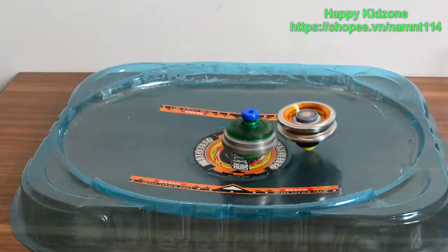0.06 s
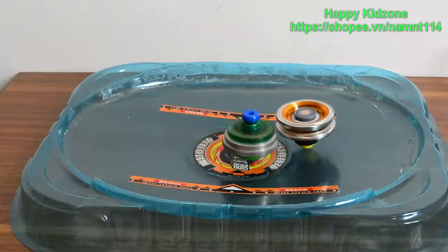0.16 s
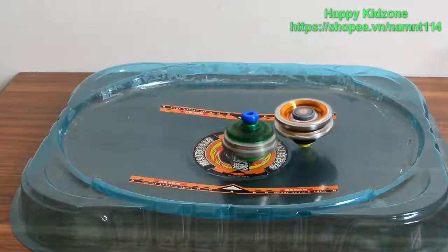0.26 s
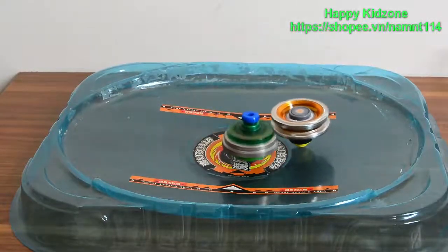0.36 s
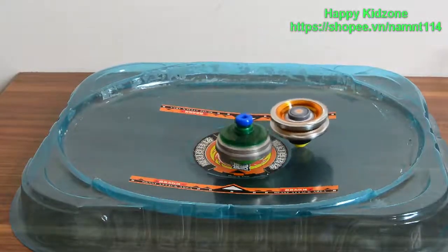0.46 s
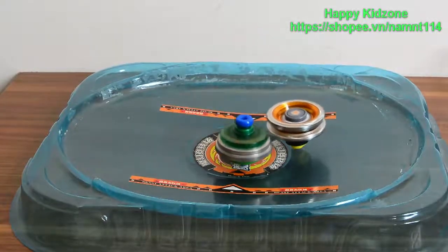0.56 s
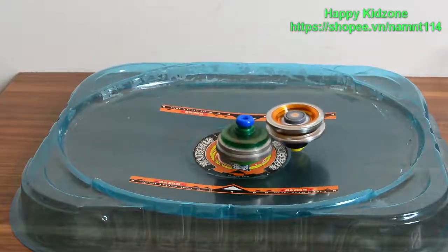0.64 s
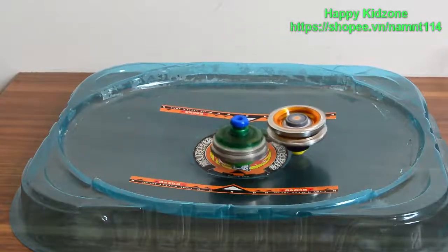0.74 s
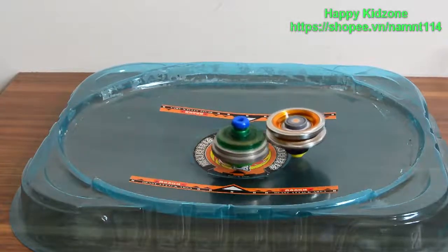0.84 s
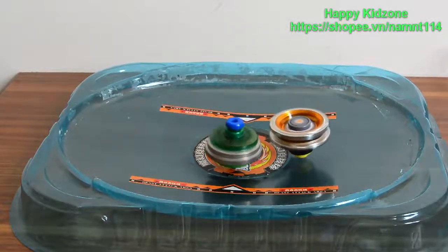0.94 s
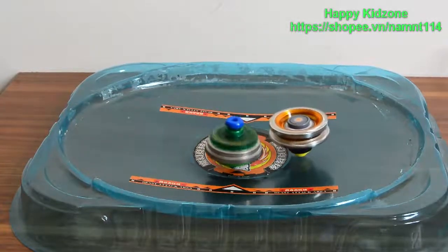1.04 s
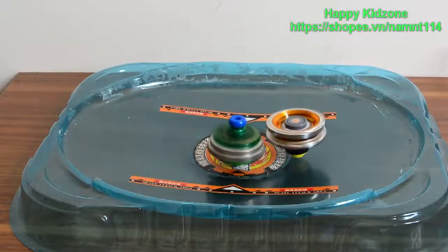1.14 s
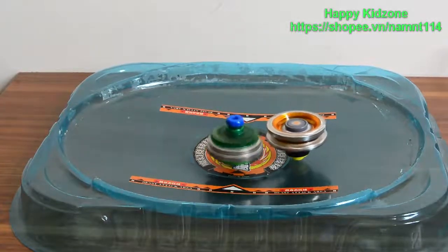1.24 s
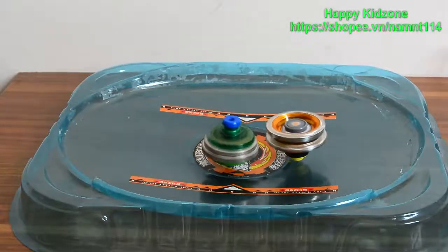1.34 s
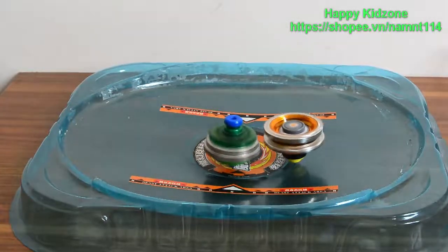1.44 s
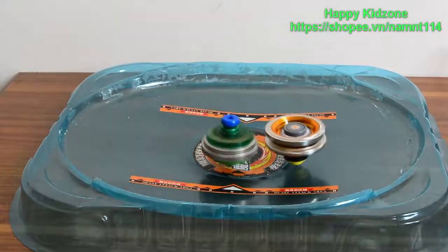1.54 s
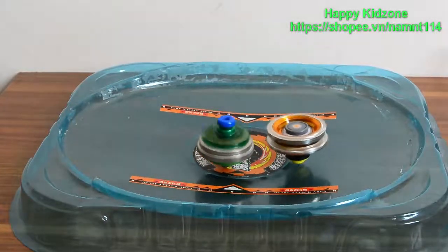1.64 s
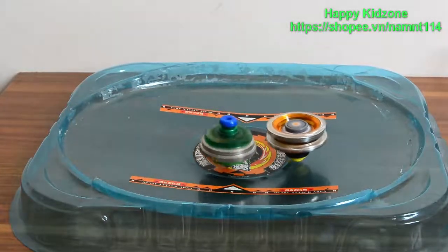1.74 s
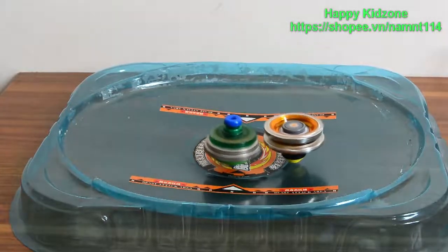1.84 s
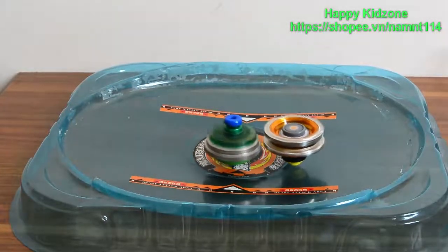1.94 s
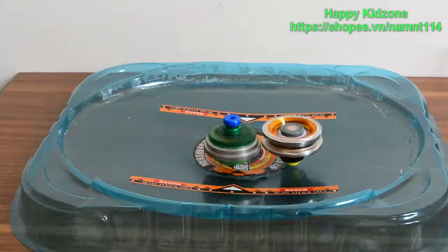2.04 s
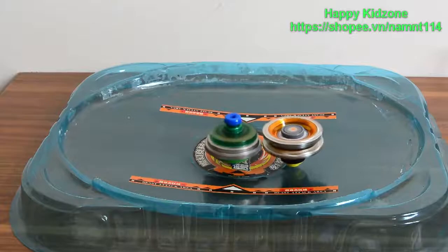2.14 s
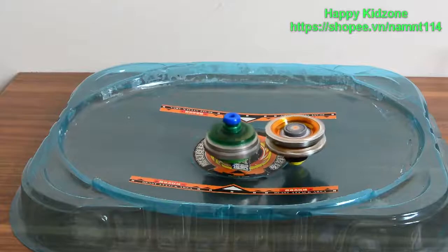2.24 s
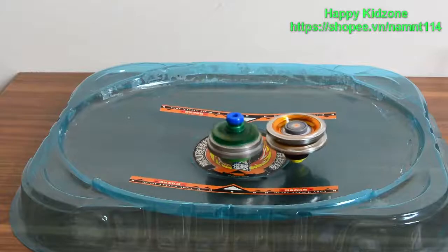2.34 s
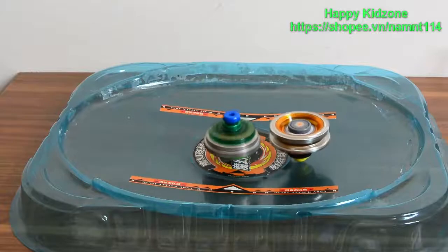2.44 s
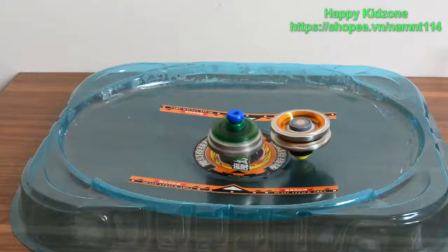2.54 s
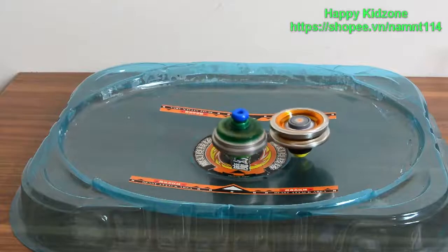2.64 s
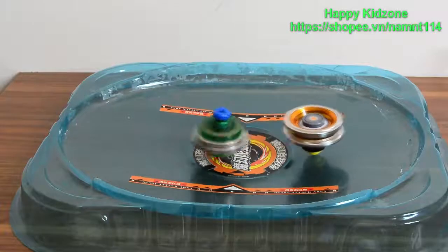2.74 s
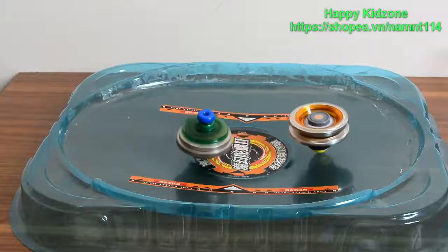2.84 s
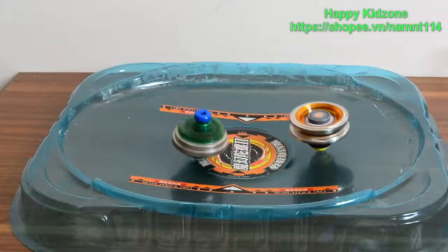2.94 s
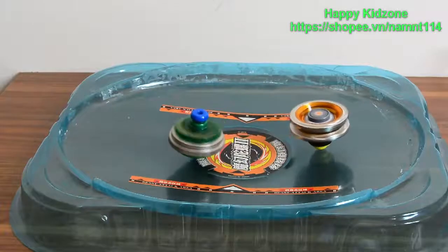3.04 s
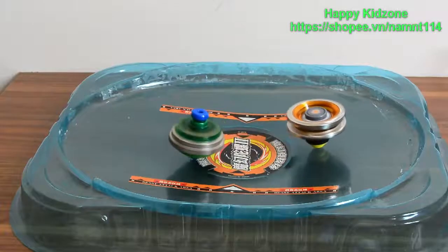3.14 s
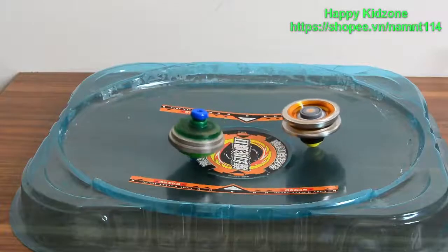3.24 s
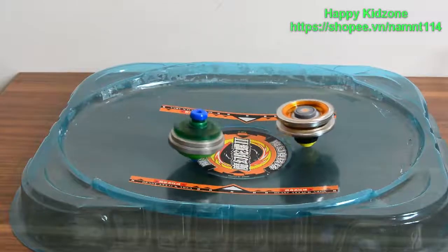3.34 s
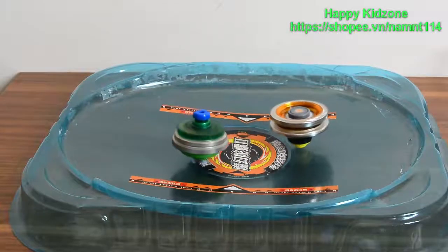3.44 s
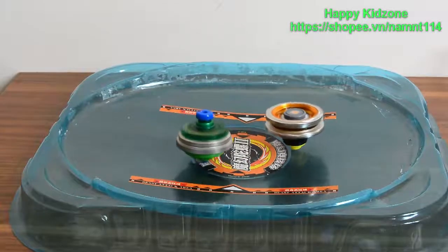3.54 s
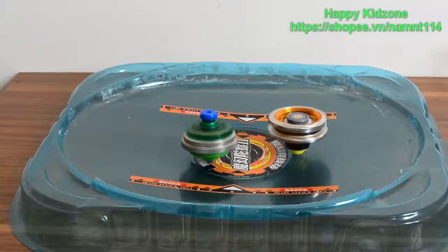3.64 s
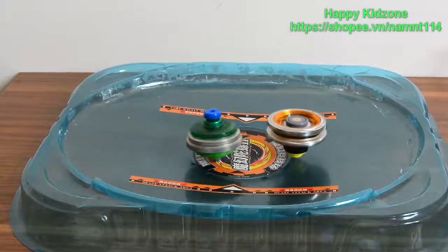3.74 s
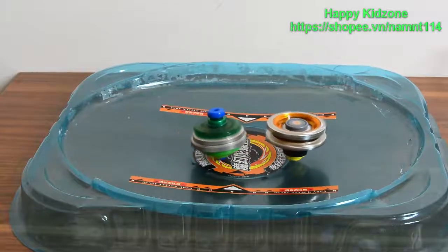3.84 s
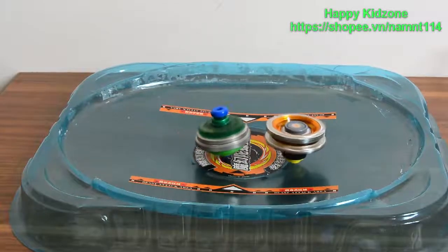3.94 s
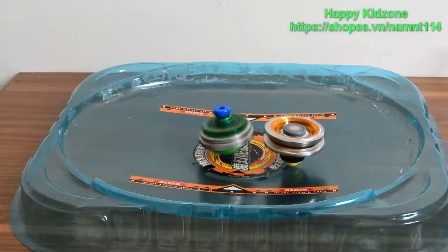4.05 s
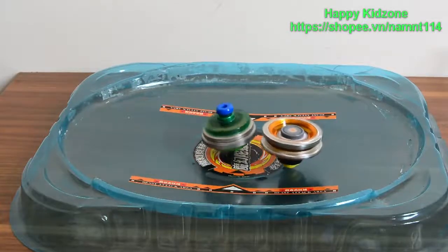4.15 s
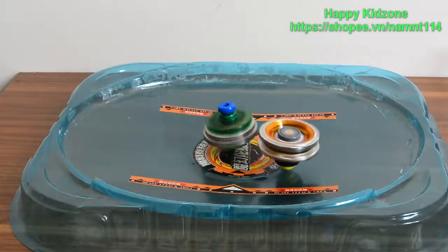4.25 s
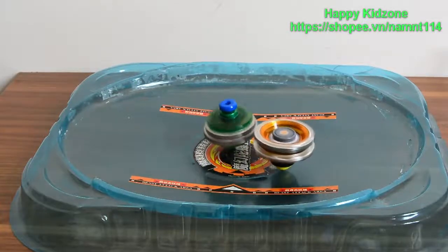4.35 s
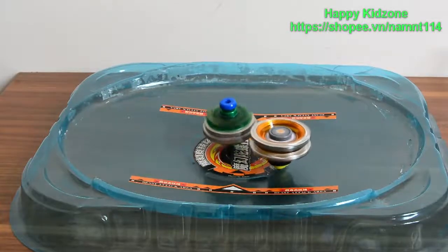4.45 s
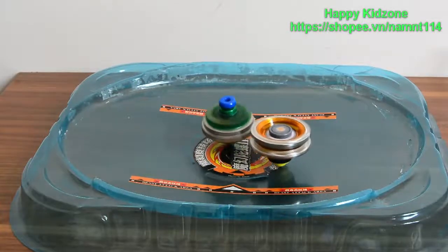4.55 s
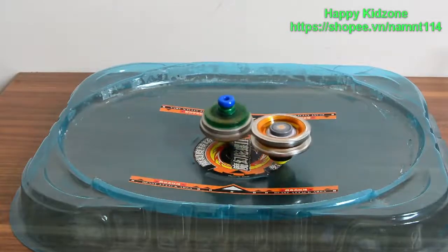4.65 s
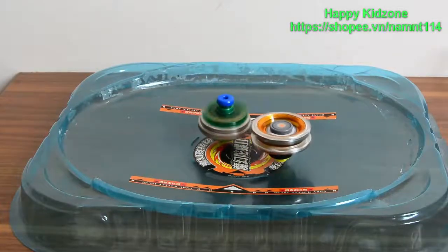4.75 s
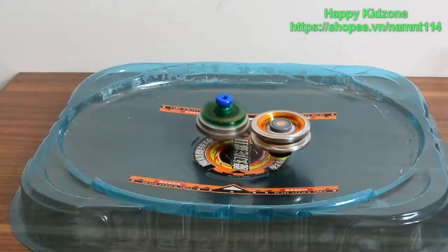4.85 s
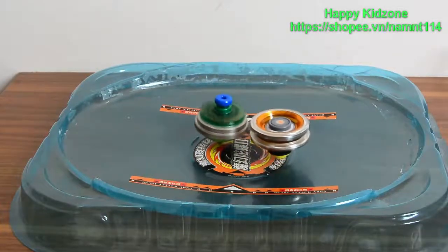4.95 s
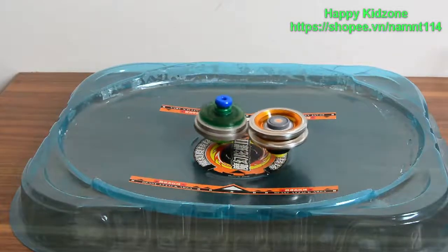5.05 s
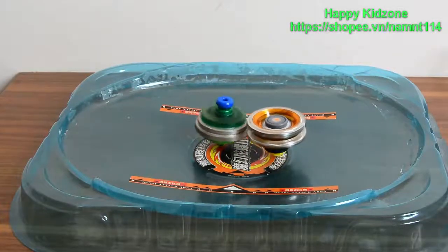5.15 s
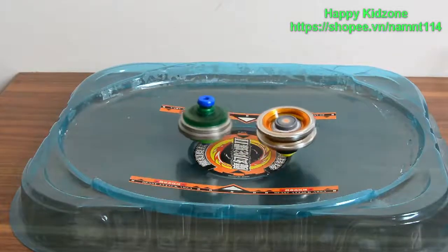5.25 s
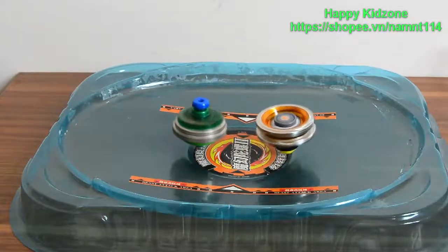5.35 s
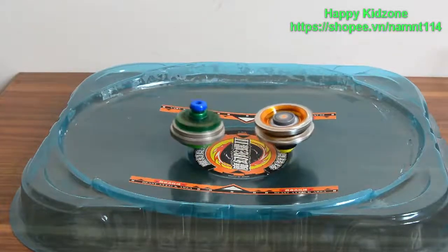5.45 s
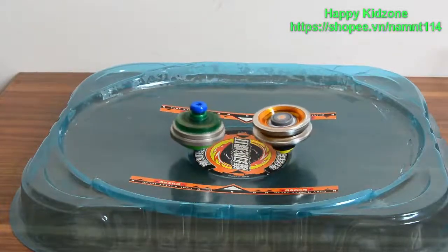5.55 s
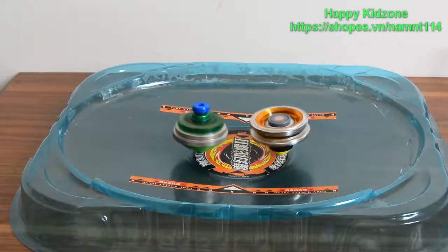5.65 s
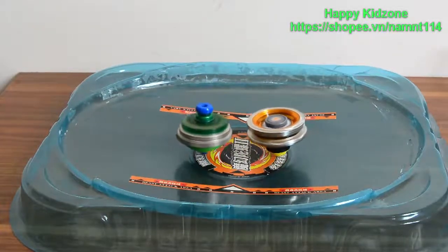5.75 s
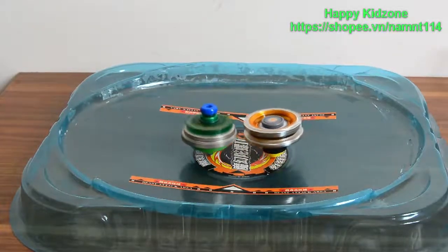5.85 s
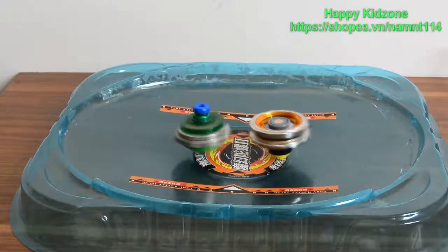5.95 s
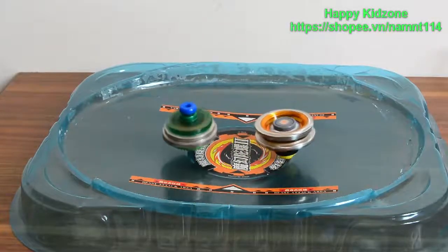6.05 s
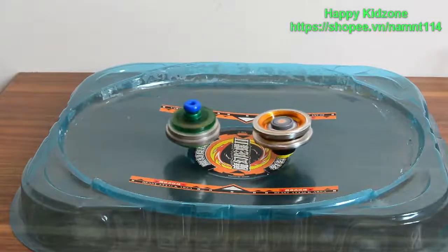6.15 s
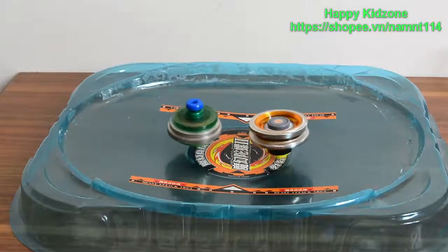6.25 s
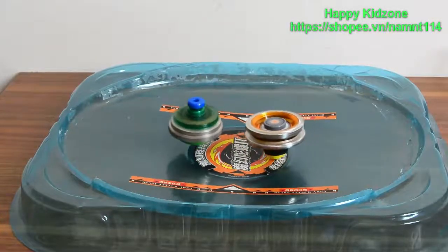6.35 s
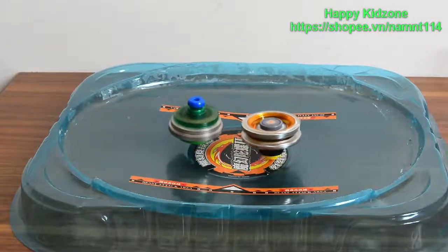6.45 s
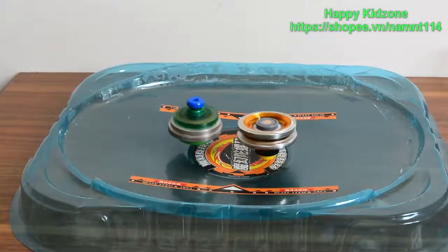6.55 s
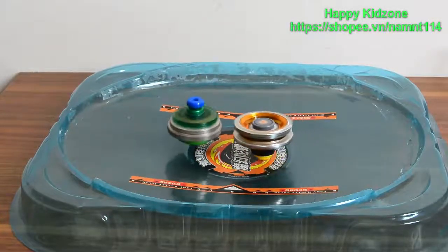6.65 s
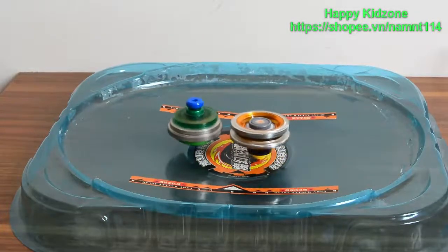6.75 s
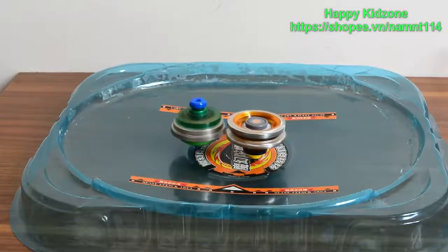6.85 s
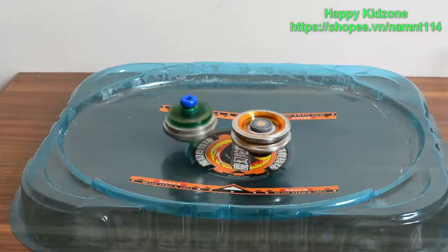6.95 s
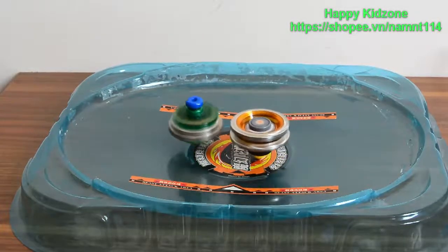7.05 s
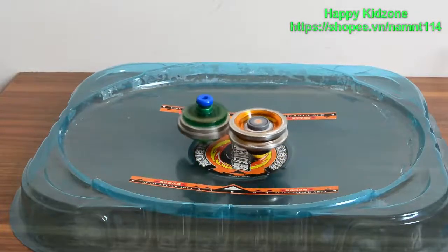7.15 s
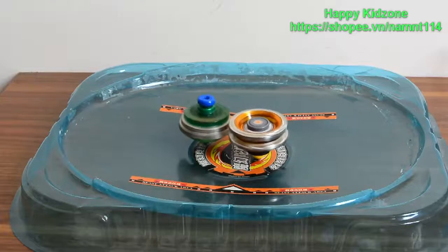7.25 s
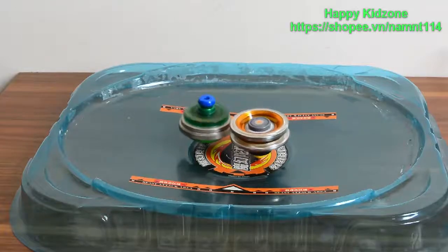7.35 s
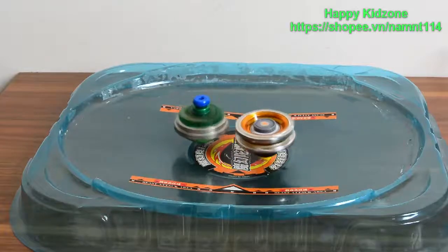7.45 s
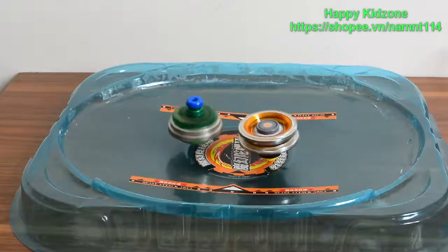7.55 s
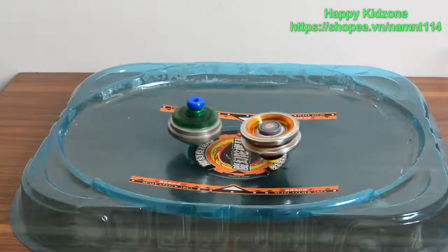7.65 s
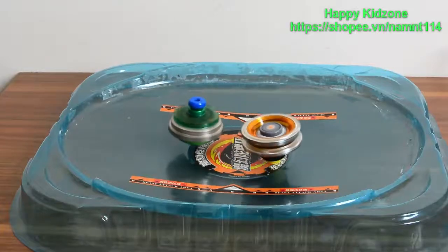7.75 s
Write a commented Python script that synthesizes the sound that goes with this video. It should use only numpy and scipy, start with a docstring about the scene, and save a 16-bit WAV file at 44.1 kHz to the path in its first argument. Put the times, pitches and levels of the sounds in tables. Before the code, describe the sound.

Frequent dry, bright clacks with brief steel ringing open the scene as two tops collide inside a hollow plastic arena. After the loudest blow, their tips skip and patter on the floor, fading over a couple of seconds. Quiet grinding continues, then widely spaced hard cracks return, with one soft thud and small plastic taps. Heard close up in a small bare room with short echoes.

```python
"""Two spinning tops with steel weight discs circle and clash in a thin plastic arena on a table, in a bare room.
Each clash is a crack of a few milliseconds that rings the tops' bodies and both discs; a wall and the room answer.
The tips rumble and scrape on the arena floor; flung apart by the hardest clash, the tops wobble and skip
until they settle, and single hard landings tap the floor. One soft bump and a steady dull room tone lie behind.
A limiter ducks peaks, then recovers."""
import sys
import numpy as np
from scipy import signal
from scipy.fft import rfft, irfft, next_fast_len
from scipy.io import wavfile
from scipy.ndimage import map_coordinates

SR = 44100
rng = np.random.default_rng(int(sys.argv[2]) if len(sys.argv) > 2 else 0)


def digitize_waveform(pressure):
    """Quantize a signal to 16-bit integers and store it at the path in sys.argv[1].

    Rows of a 2-D input are taken as channels; values are limited to [-1, 1].
    """
    field = np.atleast_2d(pressure).T
    bounded = np.clip(field, -1, 1)
    quanta = np.round(bounded * 32767).astype(np.int16)
    wavfile.write(sys.argv[1], SR, quanta)


N = 343980

# broad resonances of the arena floor: (frequency [Hz], width [Hz], level [dB])
FLOOR_MODES = [(516, 74, 1), (695, 83, 0), (805, 68, 2.5), (1190, 130, -9.5), (1713, 31, -21)]
# colour of the tips on the plastic: (frequency [Hz], relative level [dB])
TIP_COLOUR = [(300, -42.5), (700, 1.5), (1500, 4.5), (4000, 1.5), (8000, -4.5), (10500, -23.5),
              (12000, -49)]

# tips running smoothly on the floor: rms levels before their quick random flutter
RUMBLE_DB, SCRAPE_DB = -57, -55

# the spell of wobbling after the hardest clash: start, then time constants of rise and decay
WOBBLE_START_S, WOBBLE_RISE_S, WOBBLE_SETTLE_S = 3, 0.16, 0.66
SKIPS_PER_S, SKIP_DB = 120, -33  # small skips of the tips while they wobble
HOP_FLOOR_DB, HOP_RIM_DB = 19, 7  # how strongly floor and rim answer a tip
BOUNCE_S, BOUNCE_DB = .017, -4  # delay and loss of the one bounce after a hard landing

SNAP_T60_S = .003  # the first snap of rim on rim
RATTLE_S = 0.0036  # how long the rims rattle after it
SHELL_DB, SHELL_T60_S = -7, 0.059  # the plastic shell's short ring
THIN_BELOW_HZ, THIN_SHARE = 4100, 0.8  # the direct crack lacks this share of the lows
WALL_DELAY_S, WALL_DB = .011, -11  # the echo off the wall

RIM_TICK_LOW_HZ, RIM_TICK_HIGH_HZ = 4800, 5830  # squareness leaves this band unchanged
BODY_BELOW_HZ, SIZZLE_ABOVE_HZ, SIZZLE_SHARE = 3640, 8800, 0.67  # a square blow adds body and a share of sizzle
BOOM_BELOW_HZ, BOOM_GROWS, USUAL_FORCE_DB = 970, .4, -13.5  # harder blows boom more, in dB per dB
RIPPLE_DB, RIPPLE_STEP_HZ = 1.5, 130  # chance differences of colour from blow to blow

BLOW_DB, RING_DB = 7.5, -20.5  # mix gains of the coloured blow and of the discs' and bodies' low ring
TAIL_DB = -11.5  # the room's tail within the blow
BODY_DB, BODY_GROWS = -32.5, 0.6  # the bodies within the blow: louder the squarer it is, in dB per dB


def amp(db):
    """Decibels to gain."""
    return 10 ** (np.asarray(db) / 20)


def unit(x):
    """x at rms 1."""
    return x / np.sqrt(np.mean(x ** 2) + 1e-20)


def along(points, hz):
    """(Hz, value) points read on a log frequency axis."""
    f, v = np.transpose(points)
    return np.interp(np.log(hz + 1), np.log(f + 1), v)


def wobble(rate):
    """A smooth random curve through rate knots a second."""
    knots = rng.standard_normal(int(N * rate / SR) + 4)
    return map_coordinates(knots, [np.arange(N) * rate / SR])


def noise(n, spread):
    """Stereo white noise; spread is the size of the side part against the middle."""
    mid, side = rng.standard_normal((2, n))
    return np.array([mid + spread * side, mid - spread * side]) / np.hypot(1, spread)


def ticks(rate):
    """Tiny random impacts, rate a second on average, at rms 1."""
    return unit((rng.random(N) < rate / SR) * rng.standard_normal(N))


def filtered(x, response):
    """x shaped by a response of frequency, through a padded Fourier transform."""
    n = x.shape[-1]
    padded = 2 * next_fast_len(n // 2 + 2048)
    spectrum = rfft(x, padded) * response(np.fft.rfftfreq(padded, 1 / SR))
    return irfft(spectrum, padded)[..., :n]


def causal(db):
    """The minimum-phase response with these gains: nothing sounds before the blow."""
    cepstrum = irfft(np.log(amp(db)))
    half = len(cepstrum) // 2
    cepstrum[1:half] *= 2
    cepstrum[half + 1:] = 0
    return np.exp(rfft(cepstrum))


def add(track, s, sound):
    """Mix a sound into the track at time s."""
    part = track[:, max(round(s * SR), 0):][:, :sound.shape[1]]
    part += sound[:, :part.shape[1]]


def resonate(x, peaks):
    """x through the broad resonances of thin plastic, summed with alternating sign."""
    def response(hz):
        total = 0
        for k, (centre, width, db) in enumerate(peaks):
            damping = 1j * hz * width
            total = total + (-1) ** k * amp(db) * damping / (centre * centre - hz * hz + damping)
        return total
    return filtered(x, response)


def room_tail(t, spread, build):
    """Diffuse echoes that build up, then die at each frequency's own speed."""
    # reverberation of the room: (frequency [Hz], t60 [s])
    decay_times = [(200, 0.26), (800, 0.38), (2000, 0.51), (4500, 0.48), (8000, 0.45), (11000, 0.35),
                   (16000, 0.16)]
    hz, s, bands = signal.stft(noise(len(t), spread), SR, nperseg=256)
    fade = amp(-60 * s / along(decay_times, hz)[:, None])
    tail = signal.istft(bands * fade, SR, nperseg=256)[1][:, :len(t)]
    return tail * (1 - np.exp(-t / build))


def room_tone():
    """Steady dull air of the room: shaped noise."""
    # colour of the air: (frequency [Hz], relative level [dB])
    air_colour = [(24, -35), (40, -14.5), (100, -17), (140, -8.5), (200, -5), (295, -3), (569, -7.5),
                  (755, -9), (1240, -8), (2230, -16.5), (6260, -28.5), (11000, -63), (14300, -72.5),
                  (22000, -120)]
    air = filtered(noise(N, spread=0.31), lambda hz: amp(along(air_colour, hz)))
    return amp(-55.0) * unit(air)


def bump():
    """One soft dull thud somewhere in the room: low noise that swells briefly and dies away."""
    # colour of the thud: (frequency [Hz], relative level [dB])
    thud_colour = [(40, -22), (115, 2), (200, -6), (330, -5), (600, -24), (2000, -60)]
    start_s, level_db, t60_s = 5.672, -46, .2
    track, t = np.zeros((2, N)), np.arange(SR // 2) / SR
    thud = unit(filtered(noise(len(t), spread=.2), lambda hz: amp(along(thud_colour, hz))))
    envelope = amp(level_db - 60 * t / t60_s) * (1 - np.exp(-t / 0.0051))
    add(track, start_s, envelope * thud)
    return track


def rolling():
    """The tips grind and chatter on the floor at a nearly even level: noise and ticks through the plastic."""
    flutter_db = 1.2 * wobble(rate=33)
    chatter = ticks(rate=64)
    rumble = unit(resonate(noise(N, spread=0.94) + amp(-5.5) * chatter, FLOOR_MODES))
    grind = noise(N, spread=0.88) + amp(-14.5) * chatter
    scrape = unit(filtered(grind, lambda hz: amp(along(TIP_COLOUR, hz))))
    return amp(flutter_db) * (amp(RUMBLE_DB) * rumble + amp(SCRAPE_DB) * scrape)


def hops():
    """Small skips fade as the tops right themselves; single hard landings come at listed times, each with one bounce."""
    # a tip lands hard on the arena floor: (time [s], level [dB])
    landings = [(3.153, -38), (3.205, -39), (3.299, -41), (3.363, -39), (3.427, -46), (3.601, -42),
                (3.631, -40), (3.797, -40.5), (3.927, -43.5), (6.219, -34.5), (7.764, -37.5)]
    # resonances of the arena's rim: (frequency [Hz], width [Hz], level [dB])
    rim_modes = [(1545, 180, -1), (2700, 1500, -9)]
    age = np.maximum(np.arange(N) / SR - WOBBLE_START_S, 0)
    tilt = (1 - np.exp(-age / WOBBLE_RISE_S)) * np.exp(-age / WOBBLE_SETTLE_S)
    skips = ticks(SKIPS_PER_S) + amp(-6) * noise(N, spread=.3)
    track = amp(SKIP_DB - HOP_FLOOR_DB) * tilt * skips
    t = np.arange(SR // 4) / SR
    for s, db in landings:
        tap = amp(-60 * t / 0.016) * noise(len(t), spread=.2)
        tap = tap + amp(-18.5) * room_tail(t, spread=0.12, build=0.0024)
        add(track, s, amp(db) * tap)
        add(track, s + BOUNCE_S, amp(db + BOUNCE_DB) * tap)
    taps = filtered(track, lambda hz: causal(along(TIP_COLOUR, hz)))
    return amp(HOP_FLOOR_DB) * resonate(taps, FLOOR_MODES) + amp(HOP_RIM_DB) * resonate(taps, rim_modes)


def ring(modes, t, scatter_db, swing):
    """Dying modes, each at a new strength; the spin swings their phase and spreads every line into sidebands."""
    spin_hz = rng.uniform(18, 40)
    phase = swing * np.sin(2 * np.pi * (spin_hz * t + rng.random()))
    total = np.zeros(len(t))
    for hz, db, t60 in modes:
        envelope = amp(db + scatter_db * rng.standard_normal() - 60 * t / t60)
        total += envelope * np.sin(2 * np.pi * hz * t + phase)
    return total


def in_room(sound, tail):
    """A ring plus its echoes, which make it beat and waver."""
    impulse = tail / np.linalg.norm(tail[0])
    echoes = signal.fftconvolve(sound[None], impulse, axes=1)[:, :len(sound)]
    return sound + amp(-5) * echoes


def uneven(hz):
    """Each point of contact favours other modes of the plastic: a random ripple in dB."""
    knots = np.arange(0, SR / 2, RIPPLE_STEP_HZ)
    return RIPPLE_DB * np.interp(hz, knots, rng.standard_normal(len(knots)))


def contact(force_db, square_db, hz):
    """Colour of a blow in dB: a glancing one is a thin tick of the rims, a square one is full, a hard one booms."""
    fullness = along([(BODY_BELOW_HZ, 1), (RIM_TICK_LOW_HZ, 0), (RIM_TICK_HIGH_HZ, 0),
                      (SIZZLE_ABOVE_HZ, SIZZLE_SHARE)], hz)
    boom = along([(BOOM_BELOW_HZ, BOOM_GROWS), (2 * BOOM_BELOW_HZ, 0)], hz)
    return square_db * fullness + (force_db - USUAL_FORCE_DB) * boom


def crack(t, snap_db):
    """The rims snap together, rattle for a few milliseconds, and the sound comes back off the wall."""
    snap = amp(snap_db - 60 * t / SNAP_T60_S)
    rattle = np.exp(-(t / RATTLE_S) ** 2)
    shell = amp(SHELL_DB - 60 * t / SHELL_T60_S)
    direct = (snap + rattle + shell) * noise(len(t), spread=0.19)
    lows = signal.lfilter(*signal.butter(1, THIN_BELOW_HZ, fs=SR), direct)
    direct = direct - THIN_SHARE * lows
    both = direct.copy()
    add(both, WALL_DELAY_S, amp(WALL_DB) * direct)
    return both


def clashes():
    """Every contact cracks, rings the bodies and both discs, and sets off the room."""
    # contacts of the tops: (time [s], force [dB], first snap [dB], squareness [dB, far below 0 = glancing],
    # clang [dB], low disc ring [dB], high disc ring [dB])
    contacts = [(0.0062, -16.5, 0, 8, 9.5, 8.5, 16.5), (0.162, -28, -5, 1, -9, -10, -4.5),
                (0.1696, -14.5, 3.5, 2, -19, 5, 14.5), (0.276, -12, -18, 0.5, 4, -16, -9),
                (0.2904, -20.5, -14, 11, 11.5, 12, 12), (0.439, -13, -6, 1.5, -9.5, 9.5, 10),
                (0.72, -29, -20, -12, -10, 2, -5), (0.726, -12.5, 4, -0.5, 1, 7.5, 4),
                (0.932, -11, -12, -1.5, 0, 5, 2), (1.296, -12.5, -2, -1.5, 4, 10.5, 0),
                (1.5762, -9.5, -29, -2.5, -1, 6.5, -10), (1.962, -16, 4, -8, -23, 10, -9.5),
                (1.9929, -13, 5, -7, -13, -0.5, -0.5), (2.1115, -29, -22, 10, 4.5, -4, -15.5),
                (2.1271, -13, 3, 3, 7, 2.5, -10.5), (2.2285, -10, 12, -22.5, -19.5, -7, -3),
                (2.4546, -16, -35, 7, 8, 3.5, 16), (2.7521, -13.5, -20, -9, -24, -5, 4.5),
                (2.767, -5, -12.5, 1, -12.5, -3, -0.5), (5.2276, -10.5, 10.5, 1.5, 5, -1, -20.5),
                (5.9832, -20, -18, -9.5, -14.5, -21.5, -13), (5.9921, -7.5, -16.5, 2, -6.5, 3.5, -8),
                (6.9625, -5.5, -21, -2, -7.5, -9, 4.5), (7.358, -11.5, -22, 5, -3, 0.5, 10),
                (7.4901, -10, -4, -0.5, -3, -5, 8.5)]
    # colour of a clash: (frequency [Hz], relative level [dB])
    crack_colour = [(100, -43.5), (300, -29.5), (560, -14.5), (780, -8), (1000, -13.5), (1300, -7),
                    (1580, -3.5), (2200, -4), (3000, -3), (4000, -4.5), (5800, -1.5), (9000, -7.5),
                    (11200, -33.5), (16000, -35.5)]
    # lowest modes of the tops' bodies, heard as a clang: (frequency [Hz], level [dB], t60 [s])
    clang_modes = [(1516, -7, 0.26), (1589, -7, 0.42), (1625, -1.5, 0.16), (1708, -13, 0.33)]
    # higher modes of the bodies, struck by every blow: (frequency [Hz], level [dB], t60 [s])
    body_modes = [(1830, 7.5, .08), (2216, 0.5, .1), (2418, 0, .13), (2926, 6, 0.19), (2954, 4.5, .16),
                  (3030, 6, .16), (3240, 0, .12), (3750, 1, 0.17), (5580, 5.5, .07)]
    # the two steel discs, with close pairs of modes: (frequency [Hz], level [dB], t60 [s])
    low_disc = [(4274, 1, .16), (4405, -3, .25), (10315, -16, .22), (10500, -16, .28)]
    high_disc = [(4621, -3, .17), (4748, -3.5, .17), (10420, -20, .22), (12030, -28, .16), (12220, -28, .2)]
    # stereo width of the clashes: (frequency [Hz], side level [dB])
    width = [(300, -28), (700, -20), (1300, -10), (2500, -1.5), (8000, 3)]
    track, t = np.zeros((2, N)), np.arange(SR // 2) / SR
    for s, force_db, snap_db, square_db, clang_db, low_db, high_db in contacts:
        tail = room_tail(t, spread=0.8, build=0.0087)
        bodies = ring(body_modes, t, scatter_db=2, swing=1)
        struck = [(clang_db, clang_modes), (low_db, low_disc), (high_db, high_disc)]
        rings = sum(amp(db) * ring(modes, t, scatter_db=1, swing=1.15) for db, modes in struck)
        body_db = BODY_DB + BODY_GROWS * square_db
        blow = crack(t, snap_db) + amp(TAIL_DB) * tail + amp(body_db) * bodies
        blow = filtered(blow, lambda hz: causal(
            along(crack_colour, hz) + contact(force_db, square_db, hz) + uneven(hz)))
        add(track, s, amp(force_db) * (amp(BLOW_DB) * blow + amp(RING_DB) * in_room(rings, tail)))
    left, right = track * amp([[-.8], [.8]])
    # long waves reach both sides alike
    side = filtered((left - right) / 2, lambda hz: amp(along(width, hz)))
    return (left + right) / 2 + np.array([side, -side])


def scene():
    """Both tops in their arena, and the room."""
    return room_tone() + bump() + rolling() + hops() + clashes()


def limiter(x, ceiling_db, attack, release):
    """Peaks over the ceiling pull the gain down quickly; it creeps back afterwards (time constants in s)."""
    excess = 1 - np.minimum(1, amp(ceiling_db) / (np.abs(x).max(axis=0) + 1e-9))
    fade = np.exp(-np.arange(N) / SR / release)
    held = np.maximum.accumulate(excess / fade) * fade
    pole = np.exp(-1 / (attack * SR))
    return x * (1 - signal.lfilter([1 - pole], [1, -pole], held))


def record(dry):
    """A small converter offset, the limiter, clipping at full scale and a steep band limit."""
    top_hz = 16300
    limited = limiter(dry + .0024, ceiling_db=-1.5, attack=.001, release=.1)
    return filtered(np.clip(limited, -1, 1), lambda hz: 1 / (1 + (hz / top_hz) ** 100))


dry = scene()
out = record(dry)
digitize_waveform(out)
```